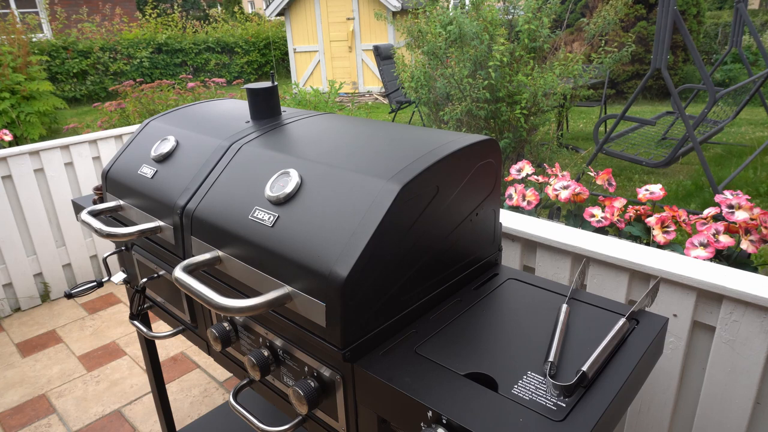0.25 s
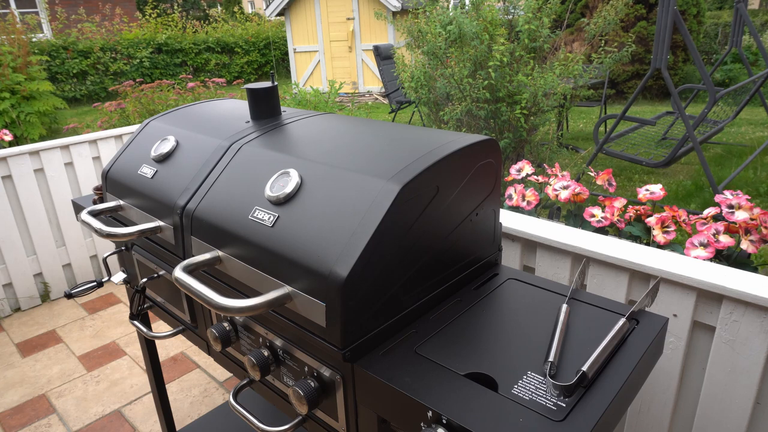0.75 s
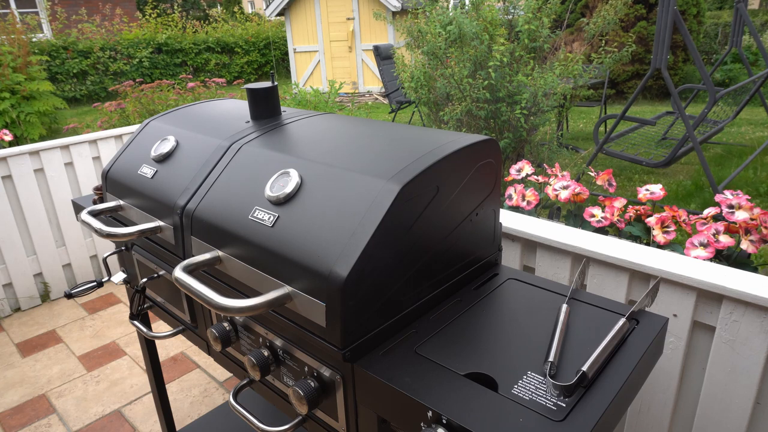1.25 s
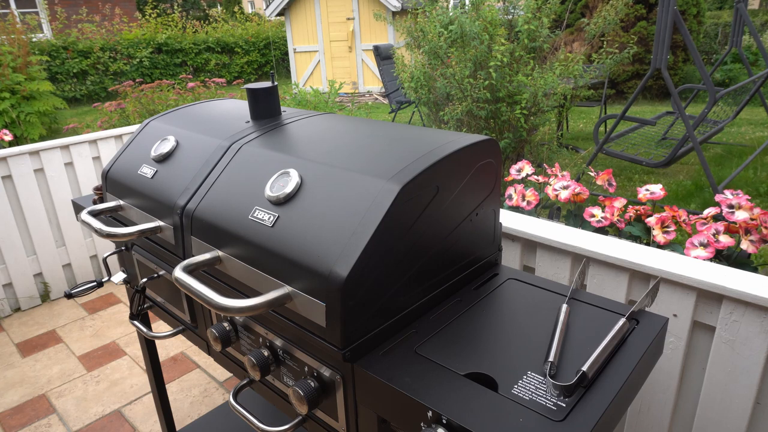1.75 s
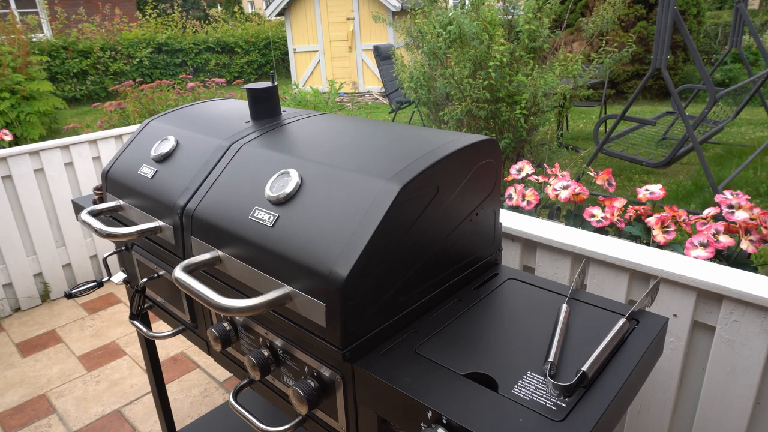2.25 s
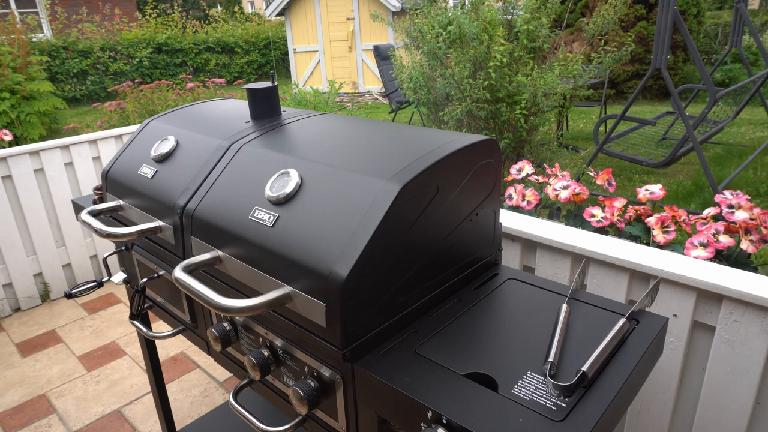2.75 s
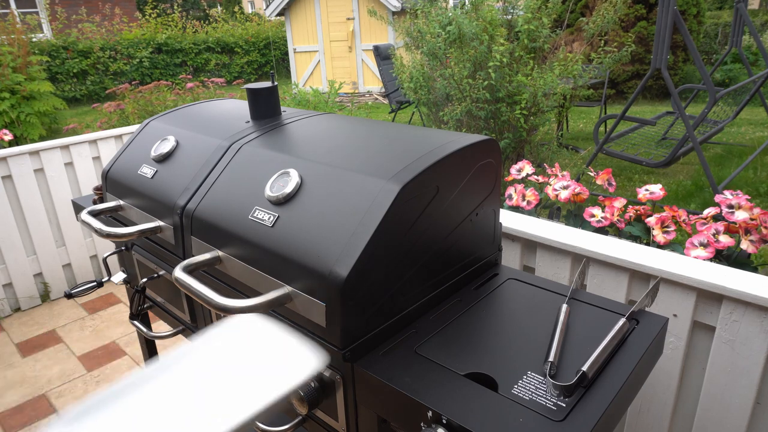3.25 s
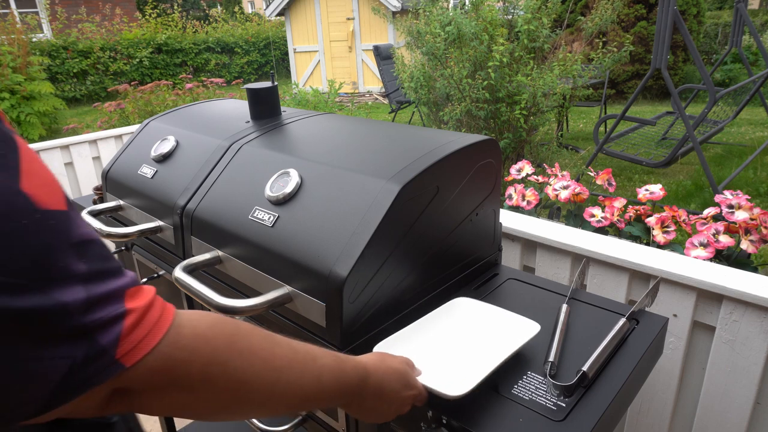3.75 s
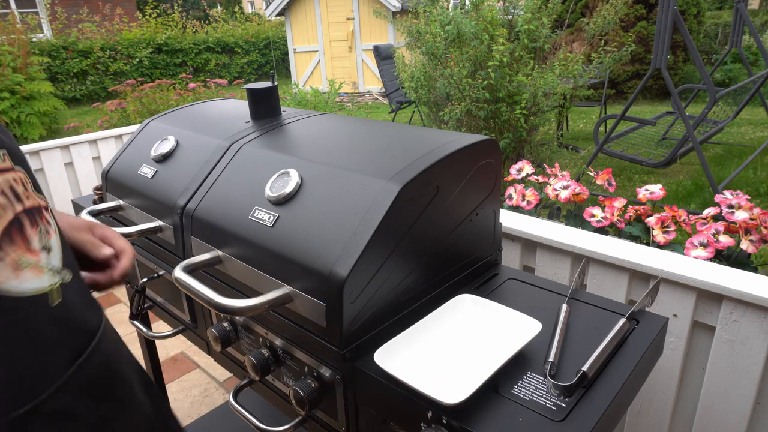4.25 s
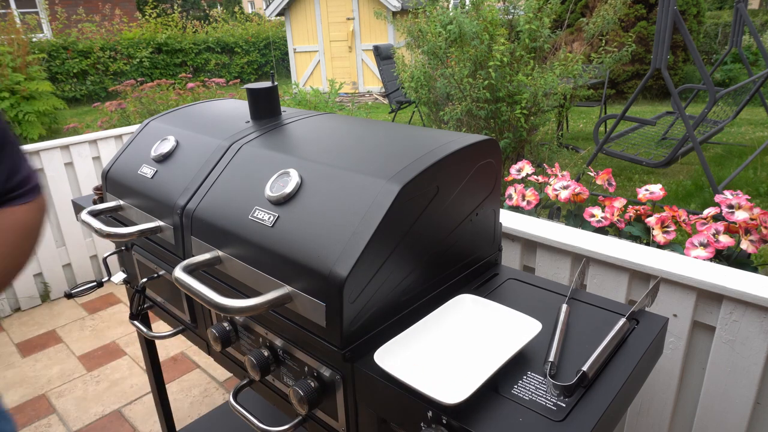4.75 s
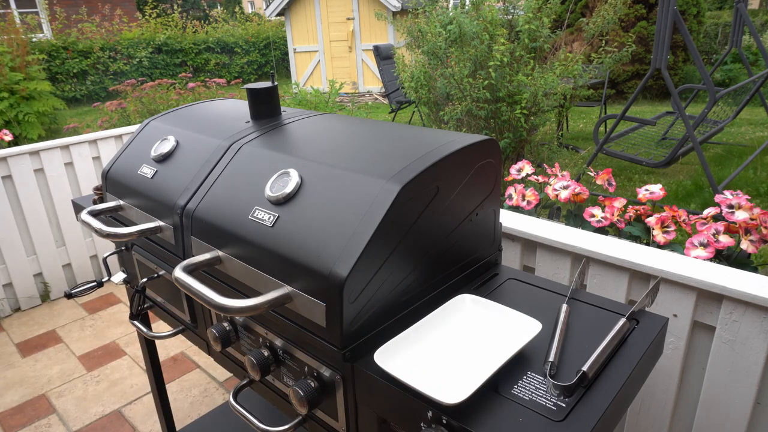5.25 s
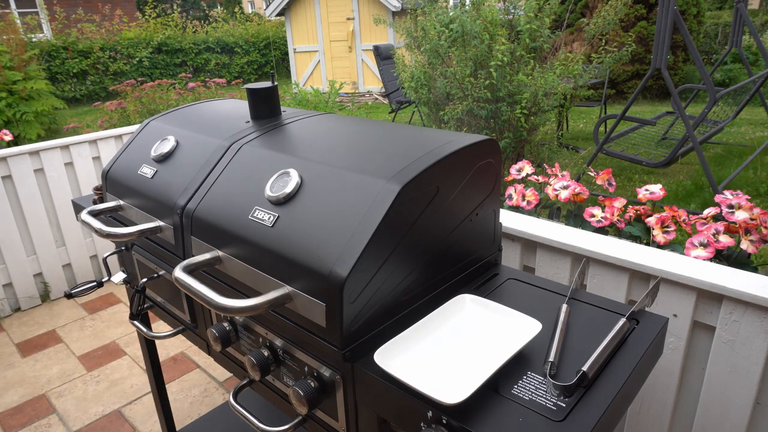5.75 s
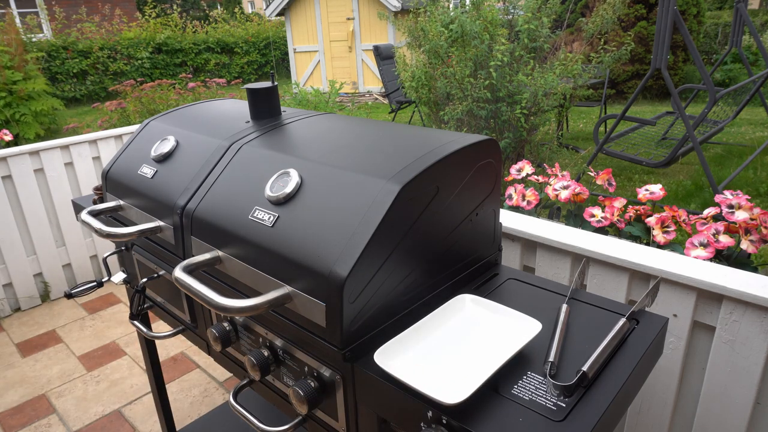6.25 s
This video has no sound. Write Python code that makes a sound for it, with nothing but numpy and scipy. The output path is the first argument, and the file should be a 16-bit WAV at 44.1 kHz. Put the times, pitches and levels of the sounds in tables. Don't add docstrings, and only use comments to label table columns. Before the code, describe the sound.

Close outdoor microphone beside a gas grill: even, crackly fat hiss leaking from the lid gap over a soft, low burner hum. Irregular spits and small knocks, dull footstep-like thuds and faint wind puffs. Then a plate hits the sheet steel shelf with a harsh, overloaded double clatter lasting under half a second, leaving a short metallic ring. The sizzle continues steadily to the end.

```python
import sys
import numpy as np
from scipy import signal
from scipy.fft import rfft, irfft, next_fast_len
from scipy.io import wavfile
from scipy.ndimage import uniform_filter1d, map_coordinates

SR = 44100
rng = np.random.default_rng(int(sys.argv[2]) if len(sys.argv) > 2 else 0)


def unload_wav(signal):
    wavfile.write(
        sys.argv[1],
        SR,
        np.round(np.clip(np.atleast_2d(signal).T, -1, 1) * 32767).astype(np.int16),
    )


def boost_factor(decibels):
    exponent = np.asarray(decibels, float) / 20
    return 10 ** exponent


N = 286209
TIME = np.arange(N) / SR
SHORT, LONG = int(.4 * SR), int(1.6 * SR)

# (frequency [Hz], density [dB per Hz])
RUMBLE_SPECTRUM = [(26, -31), (45, -2), (60, 3.5), (70, -10.5), (92, 0), (123, -1), (145, -1.5), (226, -7),
                   (260, -10), (376, -18), (411, -5), (478, -9), (600, -17), (780, -47), (1320, -120)]
# (frequency [Hz], density [dB per Hz])
BODY_SPECTRUM = [(120, -31), (200, 5), (229, 13), (260, -7), (373, -9), (408, -8), (479, -6), (594, -12),
                 (806, -9.5), (1470, -14.5), (1630, -11.5), (2020, -16), (3000, -12), (3900, -39),
                 (6600, -120)]
# (frequency [Hz], density [dB per Hz])
GAP_SPECTRUM = [(1060, -35), (1800, -1), (2680, -3.5), (2920, -2.5), (3340, -0.5), (4250, -5), (6500, -9),
                (8450, -39), (14300, -120)]
# (frequency [Hz], density [dB per Hz])
HISS_SPECTRUM = [(2350, -31), (4000, -1), (6130, -5), (7300, -3), (14200, -8.5), (15400, -7), (16200, -16)]
# (frequency [Hz], density [dB per Hz])
LID_SPECTRUM = [(1500, -13), (2400, -7.5), (2900, -3.5), (3350, -2), (3900, -6), (4800, -11), (7000, -26)]
EDGES_HZ = (62, 280, 2300, 5200, 20000)
# (frequency [Hz], level [dB], drift [Hz])
HUM = (49, -51.5, 1.38)
# (frequency [Hz], level [dB], width [Hz])
JET_TONES = [(100, -54, 11), (227, -58, 14.5), (477, -64.5, 27), (7140, -73, 120), (10374, -62, 45)]
# (time [s], level around the steady one [dB])
BOILING = [(0, -.5), (.6, -.5), (1.1, 0), (1.7, 0), (2.2, -1), (2.7, 1), (3.1, 0), (3.6, 2), (4.3, -0.5),
           (4.9, 0.1), (5.4, 1), (6.0, 0.55), (6.49, -1.5)]
# (time [s], lid gap level [dB], fine hiss level [dB], t60 [s])
SPITS = [(0, -38.5, -43, 0.14), (.258, -59.5, -39.5, 0.081), (.42, -42.5, -44, 0.49), (.667, -56, -45, .15),
         (1.238, -60.5, -42, 0.086), (1.305, -44, -52, 0.11), (1.635, -40, -41, .11),
         (1.9, -32.5, -35.5, .24), (2.131, -40, -46, .11), (2.216, -40.5, -42.5, 0.39),
         (2.308, -42.5, -48, 0.13), (2.597, -45, -42, 0.14), (2.765, -38.5, -52, 0.17),
         (3.02, -52, -44, 0.1), (3.169, -43, -47, .15), (3.195, -40.5, -48, 0.12),
         (3.315, -39.5, -45, 0.28), (4.31, -46, -48, 0.34), (4.4, -44, -43, .1), (4.77, -47, -46, .2),
         (5.01, -44, -48, .14), (5.14, -50, -44, .2), (5.286, -42, -54, .1), (5.86, -40, -50, 0.31),
         (5.955, -59, -43, .12), (6.188, -42.5, -42, .096), (6.475, -42, -44, .2)]
# (time [s], lid gap level [dB], fine hiss level [dB], t60 [s])
PUFFS = [(.47, -43, -45, .35), (.52, -48, -54, .2), (.6, -38, -48, 0.17), (1.74, -45, -45, .27),
         (1.79, -43.5, -54, 0.29), (2.28, -44, -44, 0.19), (2.508, -45, -48, .36), (4.745, -43, -51, .48),
         (5.215, -48, -56, .5), (5.365, -42, -59, .19), (5.53, -40.5, -43, 0.25)]

# (time [s], blow level [dB])
LANDINGS = [
    (3.6871, 9),
    (3.8961, 8.5),
]
# (time [s], force level [dB])
ROCKING = [
    [(3.687, -6.5), (3.72, 3.5), (3.75, -3.5), (3.805, -2.5), (3.818, -15), (3.845, -24), (3.89, -11)],
    [(3.898, -6), (3.92, -4), (3.942, -1.5), (3.96, -9.5), (3.99, -15), (4.12, -30), (4.3, -41.5)],
]
# (frequency [Hz], density [dB per Hz])
SHELF_SPECTRUM = [(35, -51), (60, -27), (118, -10), (200, -16.5), (330, -9), (527, -2.5), (651, -7),
                  (862, -2.5), (1100, -3), (1800, -6.5), (3270, -4), (4030, -9.5), (6500, -20),
                  (16000, -39)]
# (frequency [Hz], t60 [s])
SHELF_DECAY = [(100, 0.82), (280, 0.98), (480, 0.63), (700, 0.27), (1000, 0.27), (3000, 0.21), (6000, 0.16),
               (14000, 0.069)]
# (frequency [Hz], level [dB], t60 [s])
SHELF_MODES = [(225, -12.5, 0.37), (420.7, -4.5, 0.56), (535, -3.5, 0.28), (863, 2.5, 0.2),
               (1093, -0.5, 0.24), (1463, -6, 0.39), (1720, -14, 0.25), (2160, -4, 0.17), (2450, -2, 0.23),
               (2680, -14, 0.25), (2780, -8, 0.23), (3190, 3, 0.29), (3290, -17, 0.25), (3700, -11, 0.28)]
# (frequency [Hz], level [dB], t60 [s])
TONGS_MODES = [(984, -39, 3.6), (797, -36, 1.3)]

# (time [s], level [dB], centre [Hz], width [octaves], t60 [s])
KNOCKS = [(.42, -37, 1500, .9, 0.081), (.882, -34, 2070, 0.75, 0.12), (1.901, -33.5, 5000, 1.1, .09),
          (2.234, -39, 3000, .6, .02), (2.584, -38.5, 1800, 1.1, 0.06), (3.4, -38, 3200, .72, 0.03),
          (4.383, -36, 3300, .72, .02), (5.36, -36, 4200, .3, .025), (5.852, -31.5, 3000, 0.57, 0.015),
          (5.8522, -36, 1100, 1.2, .03)]
# (time [s], level [dB], centre [Hz], width [octaves], t60 [s])
BUMPS = [(1.901, -39, 1600, 1.3, .22), (2.6, -41, 1300, 0.93, .2), (4.155, -44.5, 9300, .1, .17),
         (5.853, -40, 370, 1.2, 0.34), (4.6, -42, 4300, .27, 0.22), (6.475, -40, 500, 0.65, .2),
         (4.5, -46, 300, 0.39, 0.26), (4.13, -37.5, 350, .8, 0.73), (6.107, -41, 1200, 1.6, 0.049),
         (5.525, -40.5, 3100, 0.1, .45), (5.55, -40.5, 3700, 0.22, .2), (.625, -42, 3000, 0.15, .12),
         (.49, -43, 1400, 0.96, 0.45), (5.286, -43, 4200, .5, .04)]
# (time [s], peak level [dB], frequency [Hz], length [cycles])
THUDS = [(1.879, -33, 103, 0.99), (2.3, -27.5, 216, 2.8), (2.589, -30, 430, 2.6), (3.192, -25, 181, 1.8),
         (3.399, -30.5, 156, 2.1), (4.739, -28.5, 236, 2.7), (5.142, -22.5, 198, 2.1),
         (5.868, -28, 102, 1.7)]
# (time [s], peak level [dB], hold [s], fall [dB per s])
GUSTS = [(.9, -63, .02, 30), (1.26, -57, .03, 20), (3.017, -44, 0.21, 160), (3.444, -60, .02, 76),
         (3.72, -57, .02, 60), (4.03, -59, 0.026, 110), (4.47, -52, .02, 130), (6.33, -41, .03, 140)]
# (frequency [Hz], density [dB per Hz])
WIND_SPECTRUM = [(12, -60), (22, -4), (30, 0), (45, -3), (90, -40), (200, -120)]

RUMBLE_DB, BODY_DB, GAP_DB, HISS_DB = -43.5, -45.5, -46.5, -46
GAP_FOLLOWS, BODY_FOLLOWS = 1.8, 0.15
SPIT_RISE_S, PUFF_RISE_S = 0.0025, 0.013
FULL_HARD_DB, SOFTENS_PER_DB = -1.5, 0.03
SECOND_HARDNESS = .65
TONGS_SETTLE_S, TONGS_DAMP_DB_PER_S = 4.78, 40
HARD_RISE_S, SOFT_RISE_S = .0003, .004
CALM_DB, GUST_RISE_S = -73, .07


def grill():
    boil_db, = curves(BOILING)
    flutter = wobble(14) + 0.63 * wobble(35)
    flare_power = np.zeros(N)
    hiss_power = boost_factor(HISS_DB + boil_db + 0.8 * flutter) ** 2
    for rows, rise in ((SPITS, SPIT_RISE_S), (PUFFS, PUFF_RISE_S)):
        for s, gap_db, fine_db, t60 in rows:
            here = slice(round(s * SR), round(s * SR) + SHORT)
            flare_power[here] += swell(s, gap_db, t60, rise) ** 2
            hiss_power[here] += swell(s, fine_db, t60, rise) ** 2
    bubbles = 2.2 * crackle(per_second=150, spread_db=3)

    gap = rush(GAP_SPECTRUM, *EDGES_HZ[2:4], patchy_db=1.06, grain_db=0.0, burst=bubbles)
    out = boost_factor(GAP_DB + GAP_FOLLOWS * boil_db + 0.38 * flutter) * gap
    hiss = rush(HISS_SPECTRUM, *EDGES_HZ[3:5], patchy_db=1.05, grain_db=1.14, burst=bubbles)
    out += np.sqrt(hiss_power) * hiss
    out += np.sqrt(flare_power) * rush(LID_SPECTRUM, 1000, 9000, patchy_db=.9, grain_db=1.2)
    body = rush(BODY_SPECTRUM, *EDGES_HZ[1:3], patchy_db=1.7, grain_db=0.5)
    out += boost_factor(BODY_DB + BODY_FOLLOWS * boil_db + .4 * flutter) * body
    rumble = rush(RUMBLE_SPECTRUM, *EDGES_HZ[0:2], patchy_db=1.2, grain_db=0.3)
    out += boost_factor(RUMBLE_DB + 1.6 * wobble(12)) * rumble

    hz, db, drift = HUM
    phase = 2 * np.pi * np.cumsum(hz + drift * wobble(8.1)) / SR
    out += boost_factor(db + 1.5 + 1.6 * wobble(5.17)) * np.sin(phase)
    for hz, db, width in JET_TONES:
        tone = filtered(rng.standard_normal(N), lambda f: 1 / (1 + (2 * (f - hz) / width) ** 2))
        out += boost_factor(db + 1.2 * wobble(3.86)) * unit(tone)
    return out


def plate():
    first_s, last_s = LANDINGS[0][0], LANDINGS[-1][0]
    force_db, = curves(np.vstack(ROCKING))
    hardness = np.clip(1 + SOFTENS_PER_DB * (force_db - FULL_HARD_DB), 0, 1)
    hardness *= np.where(TIME > last_s, SECOND_HARDNESS, 1)
    contacts = unit(crackle(per_second=1500, spread_db=2.5)) * boost_factor(force_db - 19.5) * (TIME > first_s)
    soft = signal.lfilter([.2], [1, -.8], contacts)
    force = hardness * contacts + (1 - hardness) * soft
    for s, db in LANDINGS:
        force[round(s * SR)] += boost_factor(db)

    out = np.zeros(N)
    stay = int(.042 * SR)
    for start in range(int(3.685 * SR), int(4.35 * SR), stay):
        out[start:][:SR + stay - 1] += signal.fftconvolve(force[start:][:stay], steel())
    settled = np.maximum(TIME[:LONG] + last_s - TONGS_SETTLE_S, 0)
    out[round(last_s * SR):][:LONG] += ring(TONGS_MODES) * boost_factor(-TONGS_DAMP_DB_PER_S * settled)
    return out


def steel():
    noise = filtered(rng.standard_normal(SR), lambda f: boost_factor(along(SHELF_SPECTRUM, f)))
    hz, t, z = signal.stft(noise, SR, nperseg=256)
    decay = along(SHELF_DECAY, hz)[:, None]
    dense = signal.istft(z * boost_factor(-60 * t / decay) / np.sqrt(decay), SR, nperseg=256)[1][:SR]
    strong = [(f, db + 1.7 * rng.standard_normal(), t60) for f, db, t60 in SHELF_MODES]
    return boost_factor(15.5) * dense / np.linalg.norm(dense) + boost_factor(-30.0) * ring(strong)[:SR]


def ring(modes):
    t = TIME[:LONG]
    return sum(boost_factor(db - 60 * t / t60) * np.sin(2 * np.pi * hz * t) for hz, db, t60 in modes)


def knocks():
    out = np.zeros(N)
    contacts = [(*k, HARD_RISE_S) for k in KNOCKS] + [(*b, SOFT_RISE_S) for b in BUMPS]
    for s, db, hz, octaves, t60, rise in contacts:
        band = lambda f: np.exp(-.5 * (np.log2((f + 1) / hz) / octaves) ** 2)
        shape = swell(s, db, t60, rise)
        impulse = TIME[:len(shape)] == TIME[30]
        blow = -np.gradient(filtered(impulse, lambda f: band(f) * hz / (f + hz / 4)))
        blow *= boost_factor(db + 15.5 - 19000 * rise) / blow.max()
        resonance = unit(filtered(rng.standard_normal(len(shape)), band))
        out[round(s * SR):][:SHORT] += blow + shape * resonance
    return out


def thuds():
    out, t = np.zeros(N + SR), TIME[:SHORT]
    for s, db, hz, cycles in THUDS:
        u = t * hz / cycles
        out[round(s * SR):][:len(t)] += boost_factor(db + 15.0) * u * np.exp(-3 * u) * np.sin(2 * np.pi * hz * t)
    return out[:N]


def breeze():
    size = boost_factor(CALM_DB + 2.5 * wobble(3.5))
    for s, db, hold, fall in GUSTS:
        arrival = np.clip(1 + (TIME - s) / GUST_RISE_S, 0, 1) ** 2
        size += boost_factor(db - fall * np.maximum(TIME - s - hold, 0)) * arrival
    return size * rush(WIND_SPECTRUM, 10, 200, patchy_db=-2.5, grain_db=5.0)


def rush(spectrum, lo_hz, hi_hz, patchy_db, grain_db, burst=0):
    z = signal.stft(rng.standard_normal(N) + burst, nperseg=512)[2]
    field = uniform_filter1d(rng.standard_normal(z.shape), size=7, axis=0)
    field = uniform_filter1d(field, size=8, axis=1)
    x = signal.istft(z * boost_factor(patchy_db * unit(field)), nperseg=512)[1][:N]
    band = lambda f: 1 / np.sqrt((1 + (lo_hz / (f + 1)) ** 16) * (1 + (f / hi_hz) ** 16))
    return unit(filtered(x * boost_factor(grain_db * wobble(220)), lambda f: boost_factor(along(spectrum, f)) * band(f)))


def crackle(per_second, spread_db):
    chance = rng.random((N, 2))
    happens = chance[:, 0] < per_second / SR
    size = boost_factor(-spread_db * np.log(chance[:, 1] + 0.0021))
    return happens * size * np.sign(rng.random(N) - .5)


def swell(s, db, t60, rise):
    t = np.maximum(TIME - s, 0)[round(s * SR):][:SHORT]
    shape = boost_factor(-60 * t / t60) * (1 - np.exp(-t / rise))
    return boost_factor(db) * shape / shape.max()


def wobble(rate):
    return map_coordinates(rng.standard_normal(2000), [TIME * rate])


def filtered(x, gain):
    m = next_fast_len(len(x) + 8192)
    return irfft(rfft(x, m) * gain(np.fft.rfftfreq(m, 1 / SR)), m)[:len(x)]


def along(points, hz):
    f, v = np.transpose(points)
    return np.interp(np.log(hz + 1), np.log(f + 1), v)


def curves(rows):
    s, *cols = np.transpose(rows)
    return [np.interp(TIME, s, c) for c in cols]


def unit(x):
    return x / np.sqrt(np.mean(x ** 2) + 1e-20)


def scene():
    return (grill() + plate() + knocks() + thuds() + breeze())[None]


def roll_off(x):
    return signal.sosfilt(signal.butter(12, 15780, fs=SR, output="sos"), x)


def record(dry):
    limited = filtered(dry[0], lambda f: 1 / (1 + (f / 15780) ** 80))[None]
    top, hard = 1.025, 14.0
    mix = limited / (1 + np.abs(limited / top) ** hard) ** (1 / hard)
    return roll_off(mix)


dry = scene()
out = record(dry)
unload_wav(out)
```